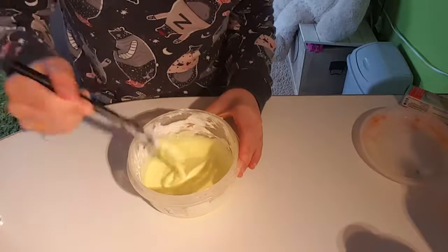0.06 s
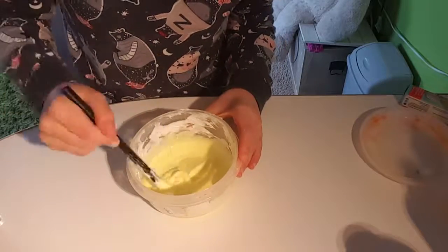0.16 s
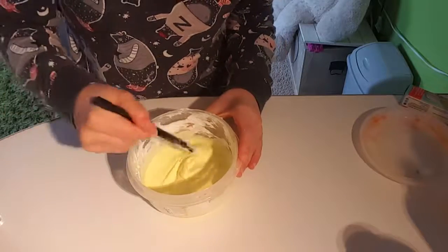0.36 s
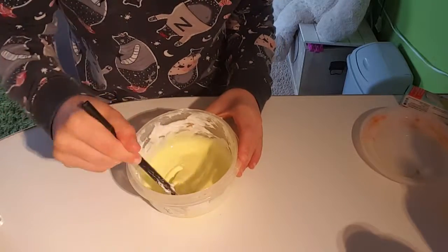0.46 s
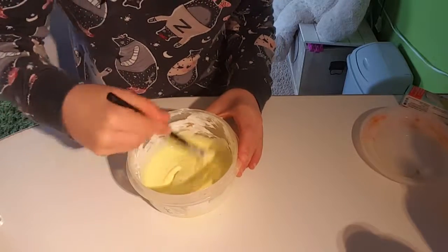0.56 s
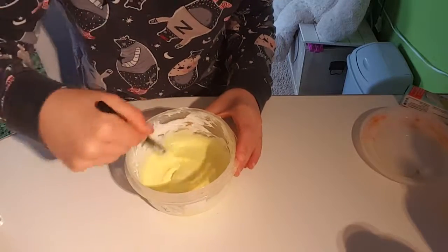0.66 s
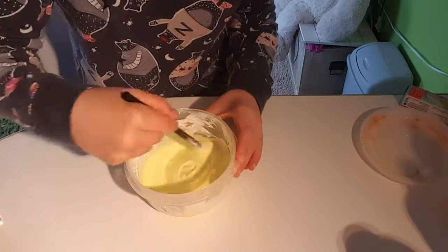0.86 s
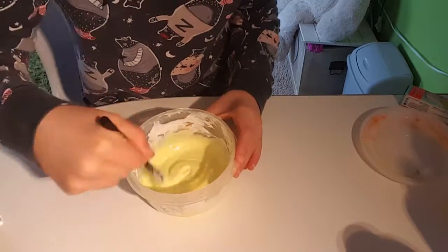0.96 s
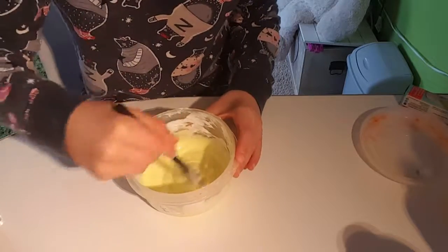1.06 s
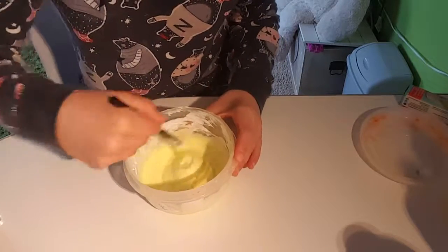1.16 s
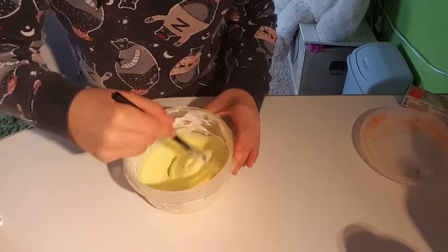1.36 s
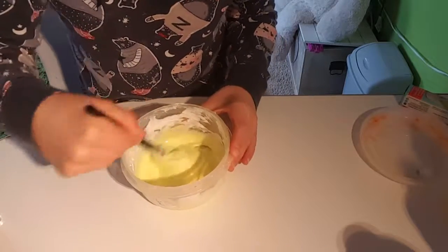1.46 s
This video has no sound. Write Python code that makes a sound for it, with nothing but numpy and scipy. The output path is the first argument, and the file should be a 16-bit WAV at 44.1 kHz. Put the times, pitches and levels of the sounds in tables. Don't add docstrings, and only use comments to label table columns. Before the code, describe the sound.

Slime being stirred in a small plastic tub: dull irregular taps, low thuds and wet smacks

```python
import sys
import numpy as np
from scipy import signal
from scipy.io import wavfile

SR = 44100
rng = np.random.default_rng(int(sys.argv[2]) if len(sys.argv) > 2 else 0)


def decibels_to_gain(level_db):
    exponent = np.asarray(level_db, float) / 20
    return 10 ** exponent


def store_pcm(level_fs):
    pcm = np.round(np.clip(level_fs, -1, 1) * 32767).astype(np.int16)
    wavfile.write(sys.argv[1], SR, np.atleast_2d(pcm).T)


N = 66150
TIME_S = np.arange(N) / SR


def rms_one(x):
    return x / np.sqrt(np.mean(x ** 2) + 1e-20)


def at_hz(points, hz):
    table_hz, value = np.array(points).T
    return np.interp(np.log(hz), np.log(table_hz), value)


def drift(rate_hz):
    r = np.exp(-2 * np.pi * rate_hz / SR)
    wander = signal.lfilter([1], [1, -2 * r, r * r], rng.standard_normal(2 * N))
    return rms_one(wander[N:])


def train(at_s, db):
    clicks = np.zeros(N + SR)
    clicks[(at_s * SR).astype(int)] = decibels_to_gain(db)
    return clicks[:N]


def decay(clicks, t60_s):
    r = np.exp(-1 / (0.0007 * SR))
    falling = signal.lfilter([1], [1, -decibels_to_gain(-60 / (t60_s * SR))], clicks)
    return signal.lfilter([1 - r], [1, -r], falling)


def swell(clicks, hz, rise_s):
    r, w = np.exp(-1 / (rise_s * SR)), 2 * np.pi * hz / SR
    return signal.lfilter([1 - r * r, 0, r * r - 1], [2, -4 * r * np.cos(w), 2 * r * r], clicks + 1e-18)


def ring(clicks, hz, db, t60_s, pan_db, lead_rad):
    r, w = decibels_to_gain(-60 / (t60_s * SR)), 2 * np.pi * hz / SR
    poles = [1, -2 * r * np.cos(w), r * r]
    ears = []
    for side in (.5, -.5):
        zeros = [np.sin(side * lead_rad), r * np.sin(w - side * lead_rad)]
        ears.append(decibels_to_gain(db + side * pan_db) * signal.lfilter(zeros, poles, clicks + 1e-18))
    return np.array(ears)


def banded_noise(spectrum, likeness, patchy_db):
    out, edges_hz = 0, 24 * 2 ** np.arange(0, 9.6, .5)
    white, together = rng.standard_normal((2, 2, N)), drift(33.0)
    for k, (low, high) in enumerate(zip(edges_hz, edges_hz[1:])):
        band = signal.butter(2, [low, high], "band", fs=SR, output="sos")
        mid, side = signal.sosfilt(band, white[k % 2])
        hz = np.sqrt(low * high)
        alike = np.clip(at_hz(likeness, hz), -1, 1)
        steep_db = -40 * max(0, np.log2(spectrum[0][0] / hz))
        flicker_db = patchy_db * (together + drift(56))
        stereo = np.sqrt(1 + alike) * mid + np.sqrt(1 - alike) * side * [[1], [-1]]
        out = out + decibels_to_gain(at_hz(spectrum, hz) + steep_db + flicker_db) * stereo
    return rms_one(out)


# (frequency [Hz], density [dB/Hz])
FLOOR_SPECTRUM = [(18, -17), (45, 9), (85, 2), (160, -1), (250, -4), (520, -8.5), (7060, -25.5),
                  (15000, -26)]
# (frequency [Hz], share [-1..1])
FLOOR_ALIKE = [(60, 0.84), (130, 0.51), (400, 0.061), (1500, 0.15), (15000, 0)]


def room_floor():
    return decibels_to_gain(-66) * banded_noise(FLOOR_SPECTRUM, FLOOR_ALIKE, patchy_db=-1.0)


# (time [s], level [dB], pitch [Hz])
THUDS = [(0.236, -24.5, 133.2), (0.2603, -24, 99.6), (0.3077, -29.5, 107), (0.3842, -48.5, 99),
         (0.4161, -45.5, 117), (0.4402, -42, 99.5), (0.4956, -50.5, 106), (0.5864, -41, 96.5),
         (0.655, -48.5, 100), (0.6816, -41, 89), (0.7146, -35, 105.4), (0.7577, -47, 103),
         (0.795, -45.5, 105), (0.8503, -45, 122.5), (0.8818, -46.5, 100), (0.925, -46.5, 105),
         (0.9633, -51, 99), (0.9854, -34.5, 104.2), (1.038, -43, 113.5), (1.1092, -42.5, 103.5),
         (1.1323, -40.5, 93.8), (1.1888, -41.5, 100), (1.2349, -43.5, 99), (1.2934, -46.5, 109),
         (1.3162, -55, 105), (1.3937, -53, 114.5), (1.4577, -52.5, 94), (1.4977, -48.5, 141)]


def thuds():
    peak_s, db, hz = np.array(THUDS).T[:, :, None]
    t = TIME_S - peak_s
    width_s = np.where(t < 0, 0.01, 0.019)
    shape = decibels_to_gain(db) * np.exp(-.5 * (t / width_s) ** 2)
    swing = np.cos(2 * np.pi * hz * t) + decibels_to_gain(-23.5) * np.cos(2 * np.pi * 2.18 * hz * t)
    sway = decibels_to_gain(-24) * np.sin(2 * np.pi * 1.38 * hz * t)
    onset = np.clip((TIME_S - KNOCKS[1][0]) / 0.0038, 0, 1)
    return np.sum(shape * (swing + sway * [[[1]], [[-1]]]), axis=1) * onset


# (pitch [Hz], level [dB], t60 [s], left over right [dB], phase lead [rad])
WALL_MODES = [(308.4, -12, 0.075, -17.5, 1.14), (366.7, 0, 0.09, -1.5, 0.093),
              (519.7, 0.5, 0.074, -2, 0.31), (625, 7, 0.027, 2.5, 0.43), (733.4, -1, 0.061, -3.5, 1.82),
              (866.6, 0, 0.09, 3.5, 1.48), (1006, -9.5, 0.15, -7, 4.45)]
RIM_MODES = [(1148, 3, .034, -1, 1.5)]
STICK_MODES = [(1558, -4.5, 0.094, -3, 0.18), (1938, -5, 0.044, 7, 0.7), (2200, 5, 0.024, -4.5, 0.18),
               (2640, -12, 0.081, -6, -0.26), (2910, -13, 0.022, -1, 0.085), (4230, -6, 0.011, 2, -0.038)]
DRAG_GROUP_DB = [-2, 2, -3]
# (time [s], level [dB])
EFFORT = [(.18, -70.5), (.3, -65), (.35, -71), (0.383, -65), (.45, -69), (.53, -66), (.61, -68.5),
          (0.719, -58.5), (.79, -62), (.87, -68), (.92, -61.5), (1.0, -64.5), (1.06, -64), (1.181, -67),
          (1.221, -57.5), (1.297, -59), (1.45, -73), (1.488, -61)]
# (frequency [Hz], density [dB/Hz])
RUSTLE_SPECTRUM = [(170, 6), (300, 3.5), (800, 4), (2300, 0.5), (4300, -2.5), (7000, -8), (12700, -4.5),
                   (15000, -13)]
# (frequency [Hz], share [-1..1])
NEAR_ALIKE = [(200, 0.4), (700, 0.57), (1400, 0), (3100, 0.48), (7000, 0), (15000, 0)]


def stirring():
    s, db = np.transpose(EFFORT)
    effort_db = np.interp(TIME_S, s, db)
    gate = np.clip((TIME_S - KNOCKS[0][0]) / 0.084, 0, 1)
    slips_per_s = 250 * decibels_to_gain(5.0 * drift(8))
    size_db = 4.5 * np.minimum(rng.exponential(1, N), 3)
    slips = (rng.random(N) < slips_per_s / SR) * decibels_to_gain(size_db)
    drag = np.zeros((2, N))
    for modes, group_db in zip((WALL_MODES, RIM_MODES, STICK_MODES), DRAG_GROUP_DB):
        for mode in modes:
            drag += ring(slips * rng.standard_normal(N), *mode) * decibels_to_gain(group_db)
    low = signal.butter(2, 63.6, fs=SR, output="sos")
    rumble = signal.sosfilt(low, rng.standard_normal(N))
    follows = decibels_to_gain(0.79 * (effort_db + 70.5) - 68)
    rubbing = follows * (decibels_to_gain(5.5) * rms_one(drag) + decibels_to_gain(8) * rms_one(rumble))
    rustle = decibels_to_gain(effort_db + 7.5) * banded_noise(RUSTLE_SPECTRUM, NEAR_ALIKE, patchy_db=2.0)
    return gate * (rubbing + rustle)


# (time [s], level [dB], pitch [Hz], t60 [s])
POPS = [(.2262, -27.5, 4540, 0.028), (.2262, -23, 2675, 0.03), (.2265, -30, 3900, 0.018),
        (.374, -44.5, 1170, .04), (.362, -54, 1146, 0.14), (.404, -47, 3500, 0.023),
        (.406, -53.5, 5830, 0.034), (.566, -33.5, 222, 0.027), (.596, -40, 260, 0.025),
        (.683, -31.5, 247, 0.034), (.700, -37.5, 784, 0.03), (.8465, -43.5, 530, 0.038),
        (.8465, -50, 900, .02), (1.013, -48.5, 4170, 0.042), (1.015, -44, 1585, 0.044),
        (1.096, -31, 653, 0.018), (1.1005, -26.5, 410, 0.02), (1.102, -39.5, 1117, 0.035),
        (1.206, -50, 2050, 0.022), (1.214, -49, 2200, 0.025), (1.241, -52, 2180, 0.018),
        (0.411, -48, 1150, .16), (1.294, -61, 2230, 0.033), (1.304, -43, 2200, 0.043),
        (1.329, -48, 2200, .015), (1.345, -58, 2270, 0.043), (1.382, -58, 4270, 0.065),
        (1.402, -46.5, 2270, 0.022), (1.403, -52, 4040, .025), (1.413, -49, 4200, 0.022),
        (1.467, -51, 2200, 0.022), (1.478, -49, 2720, 0.044), (.236, -31.5, 2000, 0.017),
        (.476, -46, 1146, 0.21), (0.4714, -40, 1168, 0.023), (.495, -42.5, 2200, .025),
        (0.527, -45, 1147, 0.059), (0.5583, -36, 415, 0.063), (.562, -42.5, 2200, 0.034),
        (.76, -52, 250, .08), (.882, -44, 660, .02), (.9475, -35, 572, 0.038), (1.104, -37, 361, 0.14),
        (1.163, -45, 527, 0.015), (1.292, -53, 710, 0.017), (1.307, -58, 1170, 0.028),
        (1.373, -43.5, 1148, 0.022), (1.380, -50, 520, 0.023), (1.492, -41.5, 443, 0.035),
        (1.495, -52, 820, 0.035)]


def pops():
    out = np.zeros((2, N))
    for s, db, hz, t60_s in POPS:
        push = swell(train(np.array([s]), db + 0.5), hz, rise_s=0.98 / hz)
        out += ring(push, hz, 0, t60_s, pan_db=0, lead_rad=0.76)
    return out


# (time [s], peak level [dB])
SMACKS = [(0.18, -48), (0.2256, -21), (0.369, -48.5), (0.403, -38.5), (0.493, -50), (0.6792, -27),
          (0.9204, -67), (0.9607, -31.5), (1.0126, -36.5), (1.096, -43.5), (1.2974, -57), (1.4054, -59),
          (1.4145, -52), (.627, -48), (.846, -45), (1.329, -52), (1.468, -54), (1.482, -52), (1.491, -45)]
# (frequency [Hz], density [dB/Hz])
SMACK_SPECTRUM = [(1800, 11.5), (4300, -5), (6500, 3), (11000, -6.5), (15000, -0.5)]


def smacks():
    s, db = np.transpose(SMACKS)
    return decay(train(s, db - 7.5), t60_s=0.038) * banded_noise(SMACK_SPECTRUM, NEAR_ALIKE, patchy_db=0)


# (time [s], wall peak [dB], rim [dB], crack [dB], centre of wall modes reached [Hz])
KNOCKS = [(0.18, -56.5, -57.5, -52.5, 620), (0.2256, -25, -48, -23.5, 457), (0.2615, -21, -37.5, -37, 462),
          (0.404, -35.5, -33, -42.5, 525), (0.47, -33, -34, -43, 610), (0.494, -43.5, -38, -48, 534),
          (.558, -28, -39.5, -42.5, 550), (0.627, -39, -41, -45, 576), (.672, -23, -32.5, -37.5, 680),
          (0.776, -45.5, -51, -51, 575), (.847, -46, -78, -59, 470), (.882, -46, -65, -78, 680),
          (0.897, -35, -43.5, -40, 805), (.918, -54, -69, -51, 700), (0.949, -28, -38.5, -44, 554),
          (1.012, -31.5, -39.5, -71, 780), (1.1004, -34, -52, -57, 400), (1.162, -42.5, -58, -69, 493),
          (1.215, -40, -72, -63, 474), (1.292, -40.5, -56, -41, 690), (1.327, -75, -48, -65, 597),
          (1.378, -41, -55, -56, 413), (1.494, -45.5, -71, -48, 424)]
# (time [s], wall peak [dB], rim [dB], crack [dB], centre of wall modes reached [Hz])
TOUCHES = [
    (0.366, -64, -57, -77, 604),
    (0.377, -66, -57, -59.5, 595),
    (0.431, -53, -57, -82, 453),
    (0.743, -68, -78, -52, 450),
    (1.242, -70, -74, -50, 433),
    (1.303, -71, -44, -59, 705),
    (1.402, -46.5, -63, -52, 408),
]
# (delay [s], level [dB])
CONTACTS = [
    (0, -2),
    (.0075, -12.5),
]
KNOCK_GROUP_DB = [-3, 6.5, -6.5]
RISE_S = [.0013, .0028, .0004]
# (frequency [Hz], density [dB/Hz])
SNAP_SPECTRUM = [(700, 2), (1500, 11), (2700, 3.5), (3400, -1.5), (5000, -4), (7000, -17), (11000, -14.5),
                 (15000, -14.5)]


def knocks():
    s, wall_db, rim_db, crack_db, centre_hz = np.transpose(KNOCKS + TOUCHES)[:, :, None]
    delay_s, loss_db = np.transpose(CONTACTS)
    jitter = 0.1 * rng.uniform(-1.33, 1, (len(s), len(delay_s)))
    at_s = s + delay_s * (1 + jitter)
    out = np.zeros((2, N))
    groups = (WALL_MODES, RIM_MODES, STICK_MODES)
    for modes, level_db, group_db, rise_s in zip(groups, (wall_db, rim_db, crack_db), KNOCK_GROUP_DB, RISE_S):
        for mode in modes:
            far_db = 20.0 * np.log2(mode[0] / centre_hz) ** 2 * (modes is WALL_MODES)
            spread_db = 1.2 * rng.standard_normal(at_s.shape)
            db = level_db - far_db + group_db + loss_db + spread_db
            push = swell(train(at_s, db), mode[0], rise_s)
            out += ring(push, *mode) * decibels_to_gain(1.5 * drift(60))
    clicks = train(at_s, crack_db + loss_db)
    shape = decibels_to_gain(-1) * decay(clicks, t60_s=0.023) + decibels_to_gain(-10) * decay(clicks, t60_s=0.12)
    return out + shape * banded_noise(SNAP_SPECTRUM, NEAR_ALIKE, patchy_db=0)


def scene():
    mic_low = signal.butter(2, 56, "high", fs=SR, output="sos")
    air = signal.sosfilt(mic_low, room_floor() + stirring())
    table = thuds() * decibels_to_gain(np.array([[-.5], [.5]]))
    return air + table + pops() + smacks() + knocks()


def band_limit(x):
    return signal.sosfilt(signal.butter(12, 15620, fs=SR, output="sos"), x)


def record(dry):
    top = signal.cheby2(10, 50, 15340, fs=SR, output="sos")
    return band_limit(signal.sosfilt(top, dry))


dry = scene()
out = record(dry)
store_pcm(out)
```